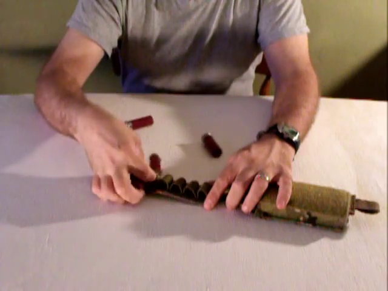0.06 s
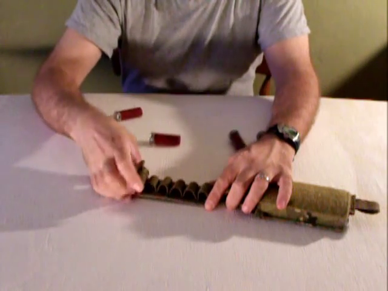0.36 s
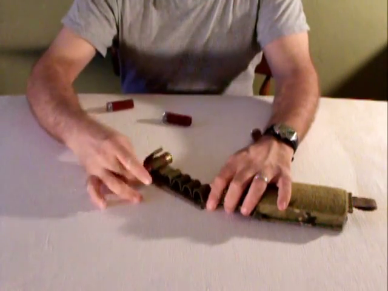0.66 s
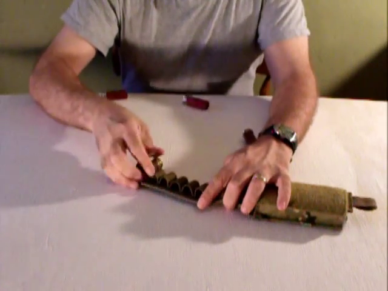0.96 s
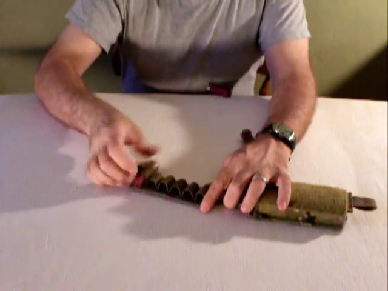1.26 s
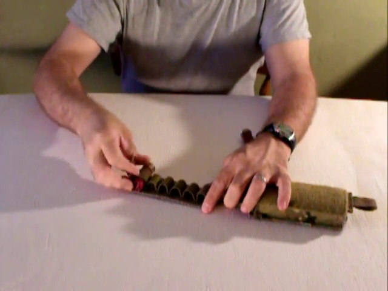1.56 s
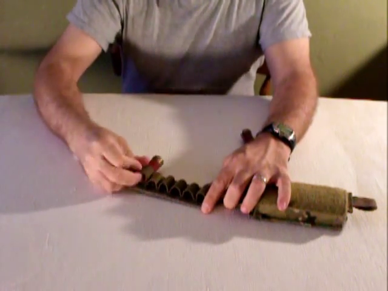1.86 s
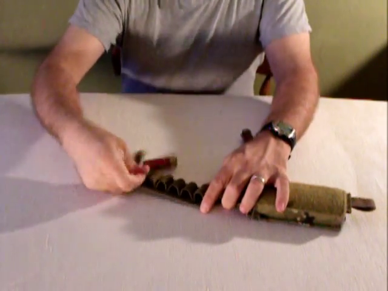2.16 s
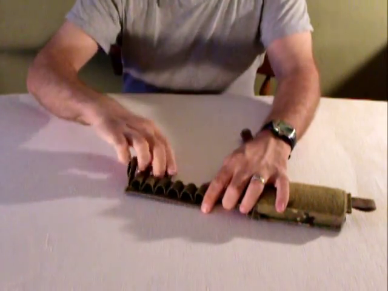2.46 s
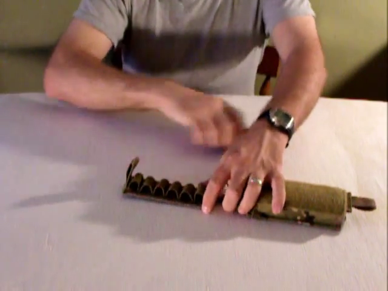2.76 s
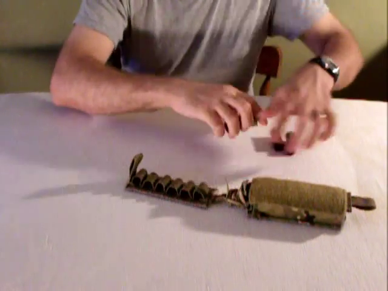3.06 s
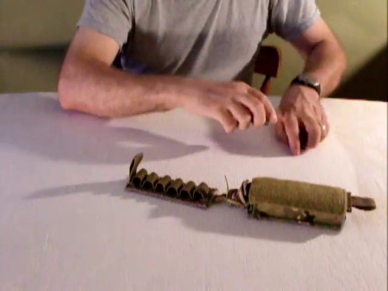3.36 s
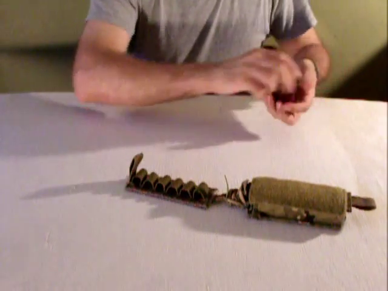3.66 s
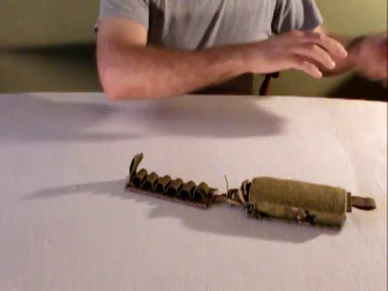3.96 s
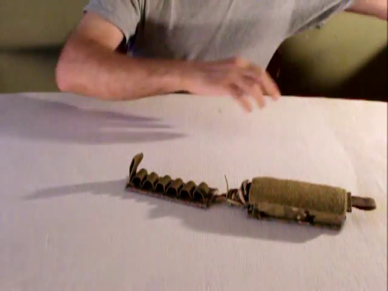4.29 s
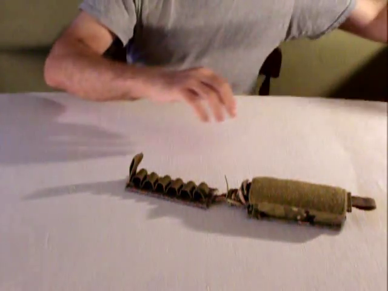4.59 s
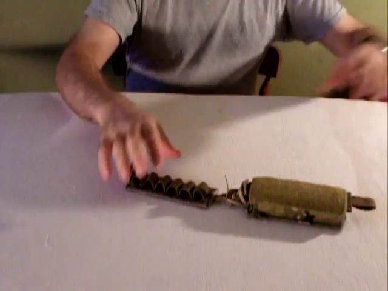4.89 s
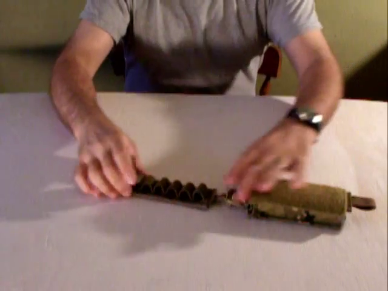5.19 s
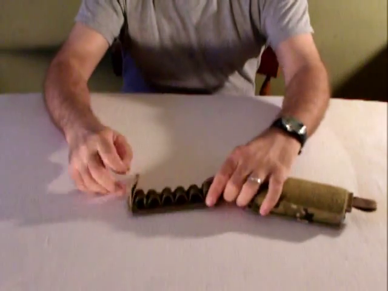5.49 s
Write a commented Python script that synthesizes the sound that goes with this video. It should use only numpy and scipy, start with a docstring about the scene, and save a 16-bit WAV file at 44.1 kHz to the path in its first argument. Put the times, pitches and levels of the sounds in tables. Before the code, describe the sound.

Shotgun shells are pushed from a pouch's elastic loops onto a table in a small, bare room. Sharp plastic knocks land at about 0.1 and 0.6 seconds, and shells roll with a hollow drone until around 1.4 seconds, among quick bumps, hull ticks and rustling webbing. More loud drops come at 1.8 and 2.2 seconds, with soft, low hand thumps around 2 seconds. Lighter knocks and a rub follow, then another roll from 2.8 seconds ends in small brass clinks near 3.3 as the shells are gathered. After a lull, more clinks and a dull bump sound at 4.3 seconds. The table creaks faintly from 4.5 seconds, and light knocks, rustle and further creaks run from 5 to about 5.7 seconds. The microphone has little treble and overloads on the loudest drops, over a faint rumble and hiss.

```python
"""Shotgun shells, pushed from the elastic loops of a pouch tray, drop on a table in a small, bare room.
Each impact excites the modes of board and plastic hull; a rolling rim drives a hollow drone. Webbing
rustles by friction, hulls tick, a hand thumps the tray, brass heads clink as the shells are gathered, and
the table creaks under a leaning arm. A narrow-band microphone overloads on the loudest drops."""
import sys
import numpy as np
from scipy import signal
from scipy.fft import rfft, irfft, next_fast_len
from scipy.io import wavfile

SR = 44100
rng = np.random.default_rng(int(sys.argv[2]) if len(sys.argv) > 2 else 0)


def unload_audio(sound):
    """Save the sound as a 16-bit wav file, at the path given as the first command line argument."""
    columns = np.transpose(np.atleast_2d(sound))
    # keep every value between -1 and 1, then stretch to whole-number steps
    steps = np.round(np.clip(columns, -1, 1) * 32767)
    wavfile.write(sys.argv[1], SR, steps.astype(np.int16))


N = 252913
TIME = np.arange(N) / SR

# Levels are relative within each table.
# Rolls of a shell, and strokes on the webbing. Each row: start in seconds, length in seconds, level in dB.
ROLLS = [(0.0, 0.092, -19.5), (0.125, 0.13, -15.5), (0.26, 0.052, -14.5), (0.34, .72, -17),
         (1.1, 0.088, -18), (1.2, .23, -29), (2.83, 0.37, -19), (3.235, 0.056, -11.5)]
RUBS = [(0.02, 0.042, -15.5), (0.25, 0.13, -24), (0.43, 0.45, -20.5), (1.02, 0.49, -33.5),
        (1.66, 0.04, -34), (2.42, 0.22, -21.5), (2.8, 0.51, -30), (3.21, 0.043, -27), (5.08, 0.41, -32),
        (5.58, 0.13, -36)]
# Modes of a shell rolling on the table. Each row: frequency in Hz, bandwidth in Hz, level in dB.
ROLL_MODES = [(147.7, 3.7, -7.5), (218, 3.5, -14), (273.5, 17, -7), (350.7, 11, 5.5), (371, 64, -3),
              (428, 25, 1.5), (490.5, 11.3, 5.5), (537, 11, -9), (613, 78, -10), (757, 70, -7),
              (1030, 500, -16)]
# Shells springing free and landing, and bumps of shells, tray and hands. Each row: start in seconds,
# level in dB, brightness in dB per octave, offset of the board's thud in dB.
DROPS = [(0.107, -3.5, -3.5, -23.5), (0.565, -1.5, -0.5, -5.5), (0.57, 0, 2, -30.5), (1.759, -4.5, 0, -4.5),
         (1.765, 0.5, -0.4, -48), (2.169, -7.5, 0, -19), (2.198, -1.5, -2, -31), (2.207, -4, 0.1, -12)]
KNOCKS = [(0.139, -6.5, 0, -23), (0.429, -15.5, -2, -14.5), (0.691, -11.5, 3, -24), (0.834, -3, -3.5, -2.5),
          (0.841, -2.5, -1.5, -11), (0.978, -7, -7, -10), (1.006, -18.5, -4, -9.5), (1.043, -2.5, 3, -22),
          (1.097, -5, 5.5, -11), (1.143, -7.5, 2.5, -25), (1.314, -16, 0, -4), (1.358, -2.5, -3, -12.5),
          (1.37, -4.5, -6, -23), (1.923, -2.5, 0, -10), (2.08, -2, -0.6, -11.5), (2.397, -8, -1, -22),
          (2.46, -14.5, -4, -25), (2.516, -9.5, -1.9, -14), (2.589, -9, 1, -32), (2.79, -16.5, -13, -25),
          (2.798, -9, 1, -21), (2.822, -8.5, -1, -14.5), (3.259, -10.5, -1, -13.5), (3.312, -11, 2, -31),
          (4.312, -20, -5.5, 9), (4.323, -18, 4.5, 10.5), (5.092, -27, 1.5, -16), (5.211, -13, -2, 1),
          (5.311, -16.5, 1, -20), (5.323, -12.5, -1, 2.5), (5.439, -10, 0.1, -1), (5.474, -18, -1, 6)]
# Thud, hollow, knock, clack and snap of an impact. Each row: lower edge in Hz, upper edge in Hz.
IMPACT_BANDS = [(125, 244), (310, 650), (620, 1272), (1450, 2804), (3400, 4890)]
# Modes of the board and, above 1500 Hz, the hulls. Each row: frequency in Hz, bandwidth in Hz, gain in dB.
BODY_MODES = [(74, 7.9, 5), (145, 15, 6.5), (191.8, 14.6, 7.5), (228.5, 21, 7.5), (297, 20, 7),
              (360.7, 18, 9), (425, 8.5, 9.5), (494.7, 9.9, 9), (671, 3.2, 5.5), (898, 6.5, 5),
              (990, 10, 6), (1093, 11, 5), (1237, 5.1, 6), (1960, 12, 9), (1958, 32, -10.5),
              (2300, 8.6, 4.5), (2600, 20, -3.5), (2865, 38, 7), (3063, 40, 7.5), (3450, 7.5, 6)]
# Hull ticks, tray thumps and table creaks. Each row: start in seconds, level in dB.
TICKS = [(0.0335, -0.5), (0.075, -10), (0.139, 3), (0.3355, -11), (0.5362, -6.5), (0.792, -11),
         (0.9349, -1.5), (0.949, -18), (1.0086, -8), (1.0455, 0), (1.0979, 0), (1.3118, 0), (1.3524, -6),
         (1.6728, -11.5), (1.925, 3), (3.2343, -10.5)]
THUMPS = [(1.924, -1.5), (2.081, 4), (2.2, -2.5)]
CREAKS = [(4.457, -20), (4.494, -19.5), (4.522, -22.5), (4.591, -24.5), (4.658, -23.5), (4.701, -18),
          (4.713, -18.5), (4.734, -22), (4.758, -20.5), (4.825, -24), (4.89, -23.5), (5.422, -14.5),
          (5.558, -13.5), (5.618, -17.5), (5.636, -16), (5.657, -23), (5.722, -17.5)]
# Brass heads touching. Each row: start in seconds, level in dB, favoured pitch in Hz, tick-to-ring ratio.
CLINKS = [(3.261, -16.5, 4800, 1.9), (3.2734, -12, 4020, 0.67), (3.3073, -11.5, 4600, 1.4),
          (3.8439, -29, 5060, 3.6), (4.2731, -28, 4670, .15), (4.2848, -21.5, 4540, .15),
          (4.316, -21.5, 4750, 2.1), (4.347, -19, 4770, 1.8), (4.939, -39.5, 4750, .1),
          (4.961, -35, 4640, .1)]
# Modes of a brass head. Each row: frequency in Hz, level in dB, 60 dB decay time in seconds.
BRASS_MODES = [(4080, 4, .03), (3670, -10, 0.02), (4720, 6, 0.0071), (4725, -4.5, 0.028), (4860, -9, 0.054)]
# Spectra of the noises. Each row: frequency in Hz, spectral density in dB.
FLOOR_COLOUR = [(25, -4), (50, -10), (80, -4), (130, -4.5), (200, -11), (330, -6), (530, -11.5),
                (1000, -13.5), (2200, -16), (4000, -19), (5500, -21.5)]
RUB_COLOUR = [(80, -14), (180, 2), (500, 10.5), (1100, 2), (1700, 2), (2800, -6), (3700, -10), (5500, -15)]
TICK_COLOUR = [(150, -23.5), (500, -0.5), (1200, 3), (2200, 2.5), (2900, 2.5), (3700, -11), (5500, -7.5)]
THUMP_COLOUR = [(40, -21.5), (75, -13), (105, 8), (160, -12), (300, -39), (1000, -61)]
CREAK_COLOUR = [(80, -23), (180, -2.5), (350, 1), (600, 2), (1200, -2), (1800, -6), (2700, -6),
                (3700, -15.5), (5500, -21)]
# Reverberation of the room. Each row: frequency in Hz, 60 dB decay time in seconds.
ROOM_T60 = [(120, 0.34), (350, 0.28), (900, 0.28), (2200, 0.3), (5000, 0.31)]


def from_db(db):
    """Amplitude grows tenfold every 20 dB."""
    return 10 ** (np.asarray(db) / 20)


def unit_energy(x):
    """Energy normalisation: the squares sum to one."""
    return x / np.sqrt(np.sum(x ** 2) + 1e-20)


def unit_rms(x):
    """Power normalisation: the mean square is one."""
    return unit_energy(x) * np.sqrt(len(x))


def at_hz(points, hz):
    """Interpolation on a log-frequency axis."""
    f, value = np.transpose(points)
    return np.interp(np.log(np.maximum(hz, 1)), np.log(f), value)


def band(x, low_hz, high_hz):
    """Causal band-pass filtering."""
    return signal.sosfilt(signal.butter(2, [low_hz, high_hz], "band", fs=SR, output="sos"), x + 1e-18)


def resonance(x, hz, width_hz):
    """Forced response of a damped oscillator with unit peak gain."""
    r = np.exp(-np.pi * width_hz / SR)
    feedback = [1, -2 * r * np.cos(2 * np.pi * hz / SR), r * r]
    return signal.lfilter(np.array([1, 0, -1]) * (1 - r * r) / 2, feedback, x + 1e-18)


def coloured(x, colour):
    """Spectral shaping by a colour table."""
    size = next_fast_len(len(x))
    gain = from_db(at_hz(colour, np.fft.rfftfreq(size, 1 / SR)))
    return irfft(rfft(x, size) * gain, size)[:len(x)]


def grains(per_s, spread_db, size=N):
    """Poisson process: impulses of random strength and sign."""
    strength = from_db(spread_db * np.minimum(rng.exponential(1, size), 4)) * rng.choice([-1, 1], size)
    return strength * (rng.random(size) < per_s / SR)


def add(track, start_s, sound):
    """Superposition of a sound on a track."""
    start = max(round(start_s * SR), 0)
    track[start:start + len(sound)] += sound[:max(N - start, 0)]


def strokes(rows, attack_s, release_db_per_s, fade_db_per_s=0):
    """Amplitude envelope: each movement rises linearly, holds or fades, then decays exponentially."""
    out = np.zeros(N)
    for start, length, db in rows:
        age = np.maximum(TIME - start, 0)
        loss_db = fade_db_per_s * age + release_db_per_s * np.maximum(age - length, 0)
        out += np.minimum(age / attack_s, 1) * from_db(db - loss_db)
    return out


def bursts(rows, colour, decay_s, size=2048):
    """Noise transients with a sudden onset and a Gaussian decay."""
    out, envelope = np.zeros(N), np.exp(-(TIME[:size] / decay_s) ** 2)
    for start, db in rows:
        noise = coloured(rng.standard_normal(size), colour)
        add(out, start, from_db(db) * unit_energy(noise * envelope))
    return out


def echoes(hz, build_s=0.0034, size=17000):
    """Diffuse field: wall reflections build up and decay, differently for every spot on the table."""
    t = TIME[:size]
    decay = np.exp(-np.log(1000) * t / at_hz(ROOM_T60, hz))
    return unit_energy(rng.standard_normal(size) * (1 - np.exp(-t / build_s)) * decay)


def in_room(x, direct_db):
    """Reverberation: the power is shared between direct sound and echoes that decay band by band."""
    edges, direct = np.geomspace(80, 7000, 7), from_db(direct_db)
    tail = sum(band(echoes(np.sqrt(low * high)), low, high) for low, high in zip(edges, edges[1:]))
    return (direct * x + signal.fftconvolve(x, unit_energy(tail))[:N]) / np.hypot(direct, 1)


def noise_floor():
    """Stationary noise: a faint rumble and hiss."""
    return unit_rms(coloured(rng.standard_normal(N), FLOOR_COLOUR))


def rolling(turn_hz, lurch_db, rattle_db):
    """Forced vibration: rim bumps, harder once a turn, drive low modes while the shot rattles inside."""
    turn = from_db(lurch_db * np.sin(2 * np.pi * turn_hz * TIME))
    bumps = grains(per_s=2500, spread_db=0.55) * turn
    drone = sum((-1) ** k * from_db(db) * resonance(bumps, hz, width)
                for k, (hz, width, db) in enumerate(ROLL_MODES))
    rattle = band(grains(per_s=60, spread_db=4.6) * turn, 990, 3000)
    # The level falls as the shell slows and dies once it is stopped.
    motion = strokes(ROLLS, attack_s=0.022, release_db_per_s=192.5, fade_db_per_s=6.5)
    return motion * (unit_rms(band(drone, 100, 1500)) + from_db(rattle_db) * unit_rms(rattle))


def webbing(slips_per_s, ticks_per_s, tick_db):
    """Stick-slip friction: fibres catch and release, and now and then a hull ticks in its loop."""
    slips = unit_rms(coloured(grains(slips_per_s, spread_db=5), RUB_COLOUR))
    ticks = unit_rms(coloured(grains(ticks_per_s, spread_db=3.5), TICK_COLOUR))
    effort = strokes(RUBS, attack_s=0.02, release_db_per_s=82.5)
    return effort * (slips + from_db(tick_db) * ticks)


def hull_ticks():
    """Brief contact gives a broad spectrum: plastic hulls tick against fingers and loops."""
    return bursts(TICKS, TICK_COLOUR, decay_s=0.002)


def impacts(rows, gain_db, band_db, direct_db, chatter, size=3000):
    """Impulsive excitation: a contact, dying rebounds and their echoes; harder contact is brighter."""
    out, settling = np.zeros(N), np.exp(-TIME[:size] / 0.012)
    centres_hz = np.sqrt(np.prod(IMPACT_BANDS, axis=1))
    octaves = np.log2(centres_hz[1:] / centres_hz[2])   # from the knock band
    for start, db, brightness, thud_db in rows:
        force = chatter * unit_energy(grains(per_s=1800, spread_db=1, size=size) * settling)
        force[0] += 1   # first contact
        gains = from_db(gain_db + db + np.append(thud_db, brightness * octaves) + band_db)
        for k, (low, high) in enumerate(IMPACT_BANDS):
            heard = echoes(centres_hz[k])
            # Alternating signs join neighbouring bands without a notch.
            add(heard, 0, (-1) ** k * from_db(direct_db) * unit_energy(force))
            add(out, start, gains[k] * unit_energy(band(heard, low, high)))
    return out


def board_and_hulls(x):
    """Modal filtering: board and hulls impose their peaks and dips on every impact."""
    return x + sum((from_db(db) - 1) * resonance(x, hz, width) for hz, width, db in BODY_MODES)


def tray_thumps():
    """Soft contact gives a low spectrum: a hand presses the tray down as a shell comes free."""
    return bursts(THUMPS, THUMP_COLOUR, decay_s=0.031)


def brass_clinks(focus_hz, size=6000):
    """Free vibration: brass heads tick and ring, and the spot struck favours modes near one pitch."""
    out, t = np.zeros(N), TIME[:size]
    contact = np.exp(-t / 0.0015)
    for start, level_db, favoured_hz, tick_ratio in CLINKS:
        tick = unit_energy(band(rng.standard_normal(size) * contact, 3980, 5240))
        ring = np.zeros(size)
        for hz, db, t60 in BRASS_MODES:
            coupling = 1 / np.hypot(1, (hz - favoured_hz) / focus_hz)
            ring += coupling * from_db(db - 60 * t / t60) * np.sin(2 * np.pi * hz * t)
        add(out, start, from_db(level_db) * (unit_energy(ring) + tick_ratio * tick))
    return out


def table_creaks():
    """Stick-slip under load: the table gives in short, dry bursts beneath a leaning arm."""
    return bursts(CREAKS, CREAK_COLOUR, decay_s=0.013)


def scene():
    """Superposition in one room; the creaks, close to the microphone, are mostly direct sound."""
    drops = impacts(DROPS, gain_db=28.5, band_db=[-6.5, -7.5, -3.5, -3.5, -8.5], direct_db=-6,
                    chatter=2.17)
    knocks = impacts(KNOCKS, gain_db=24.5, band_db=[-9.5, -10, -4, -8.5, -18.5], direct_db=-4.5,
                     chatter=2.7)
    rolls = from_db(-3.62) * in_room(rolling(turn_hz=17, lurch_db=1, rattle_db=-22.5), direct_db=9.5)
    rustle = from_db(-9) * in_room(webbing(slips_per_s=250, ticks_per_s=37, tick_db=-9), direct_db=4.5)
    ticks = from_db(11) * in_room(hull_ticks(), direct_db=4)
    clinks = from_db(17) * in_room(brass_clinks(focus_hz=300), direct_db=3)
    creaks = from_db(16) * in_room(table_creaks(), direct_db=15)
    thumps = from_db(2) * in_room(tray_thumps(), direct_db=8)
    floor = from_db(-40) * noise_floor()
    return (board_and_hulls(drops + knocks) + rolls + rustle + ticks + clinks + creaks + thumps + floor)[None]


def record(dry):
    """Nonlinear distortion: after saturation and a low-pass, clipped overshoots splatter into the treble."""
    headroom, cutoff_hz, splatter_cutoff_hz = 1.34, 5500, 16000
    saturated = headroom * np.tanh(dry / headroom)
    narrow = signal.sosfilt(signal.ellip(10, 0.5, 85, cutoff_hz, fs=SR, output="sos"), saturated)
    clipped = np.clip(narrow, -1, 1)
    return signal.sosfilt(signal.butter(8, splatter_cutoff_hz, fs=SR, output="sos"), clipped)


dry = scene()
out = record(dry)
unload_audio(out)
```